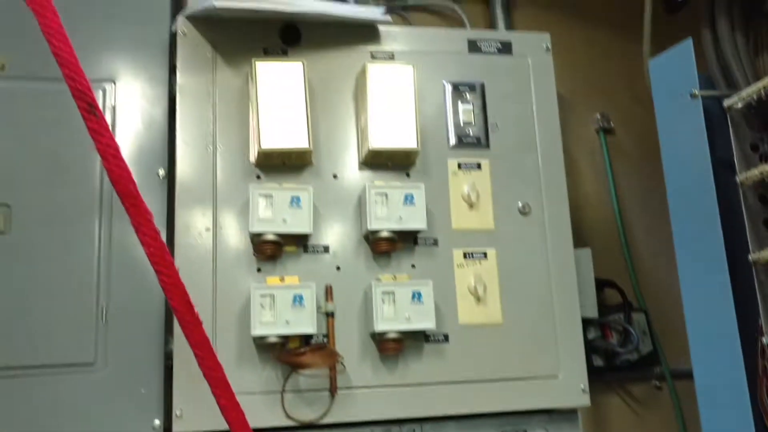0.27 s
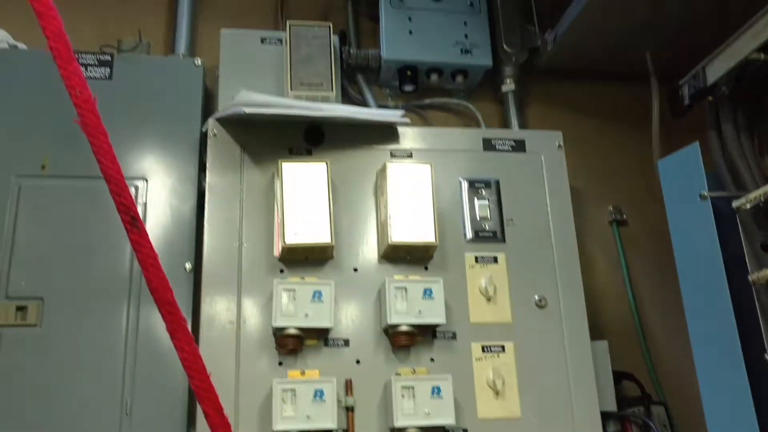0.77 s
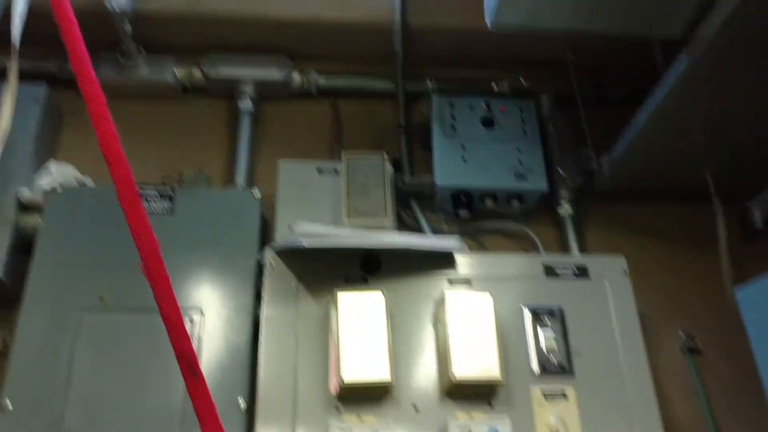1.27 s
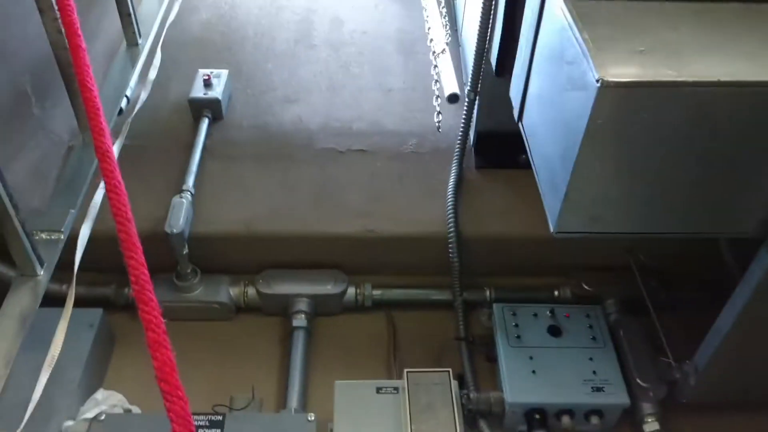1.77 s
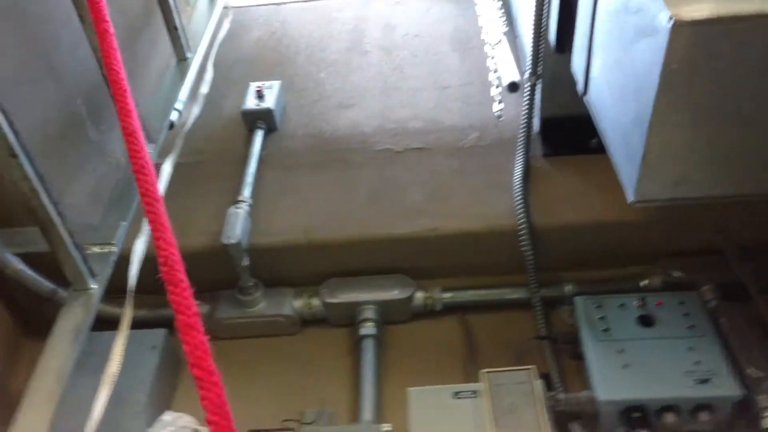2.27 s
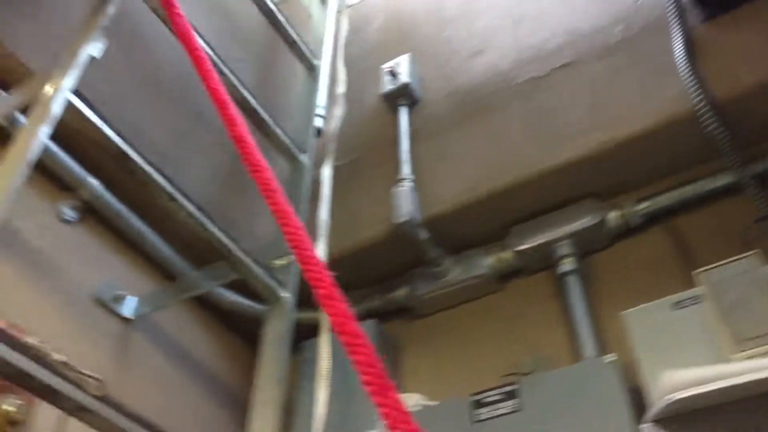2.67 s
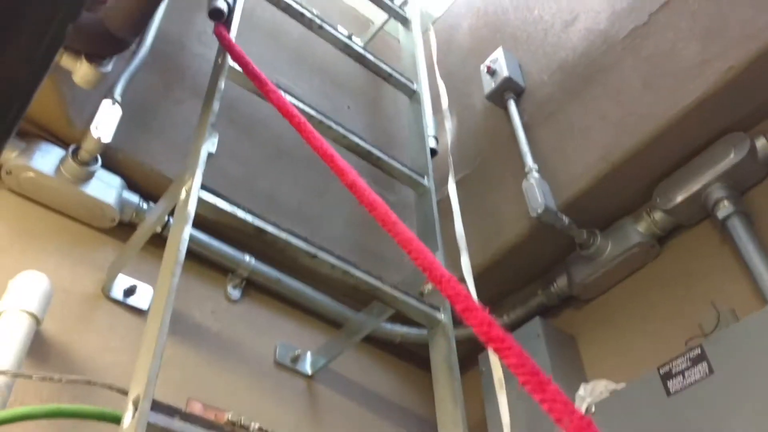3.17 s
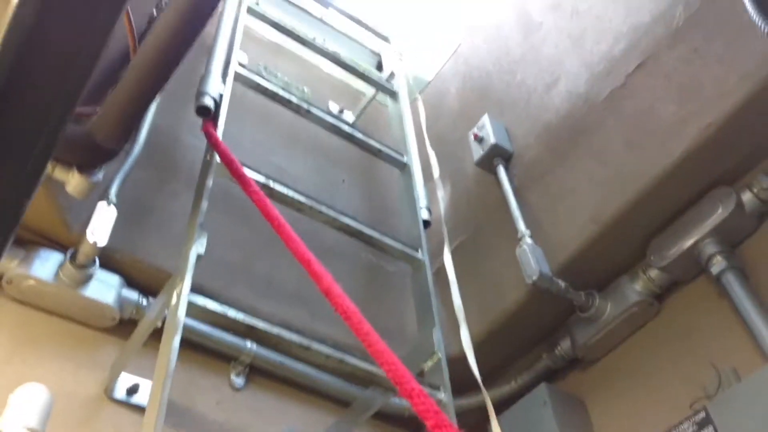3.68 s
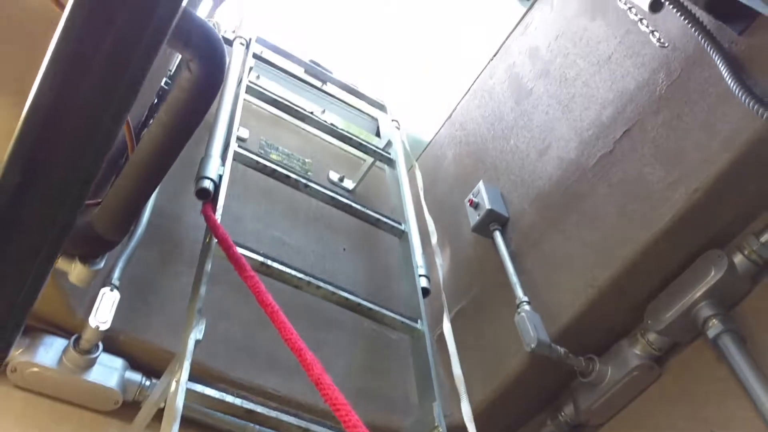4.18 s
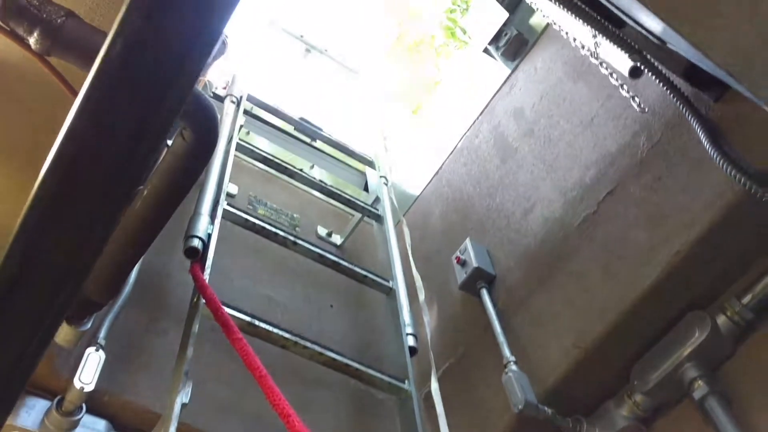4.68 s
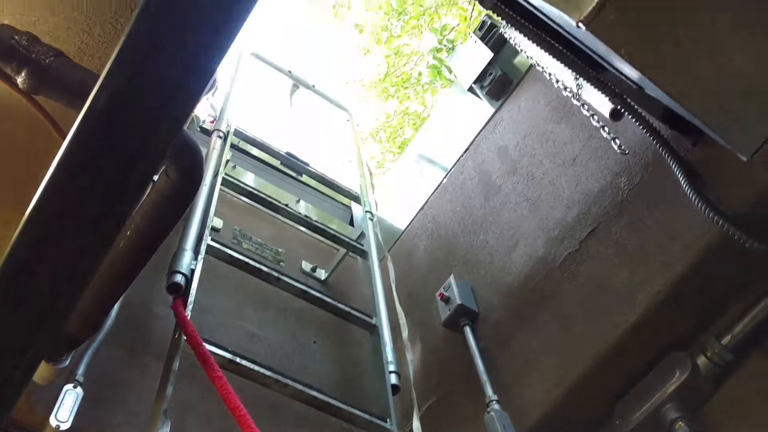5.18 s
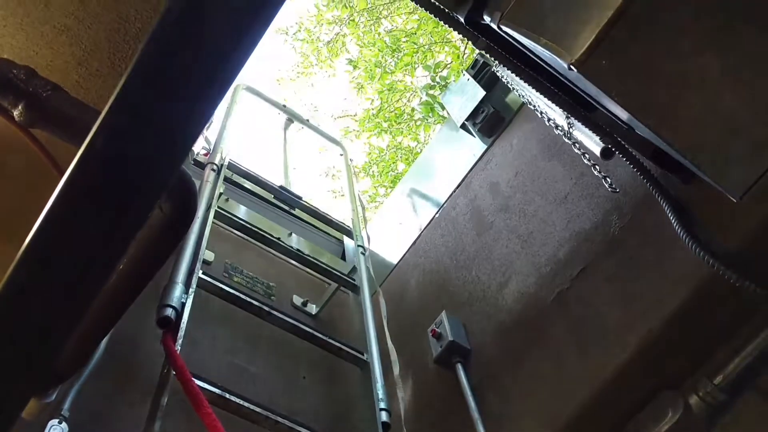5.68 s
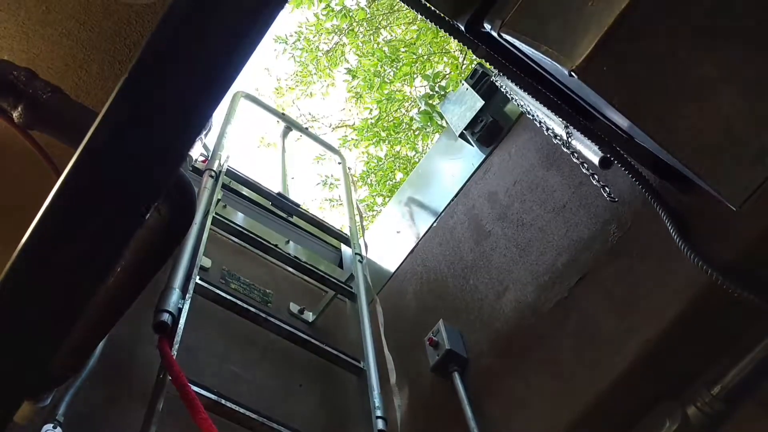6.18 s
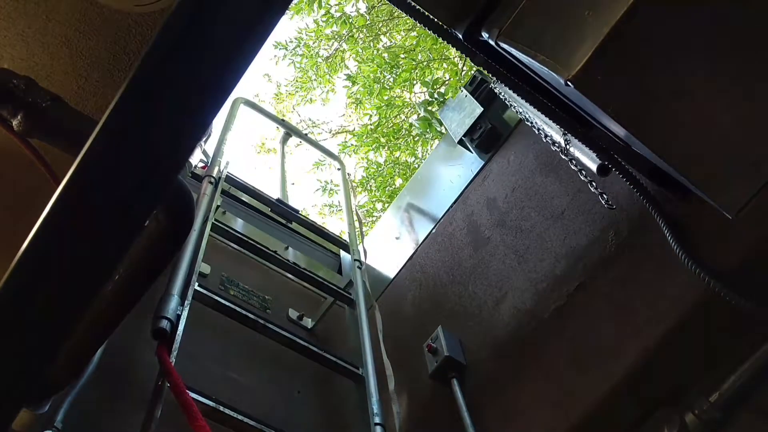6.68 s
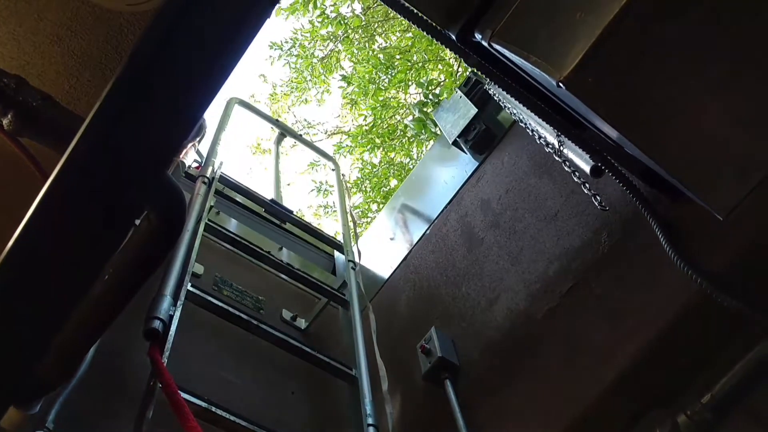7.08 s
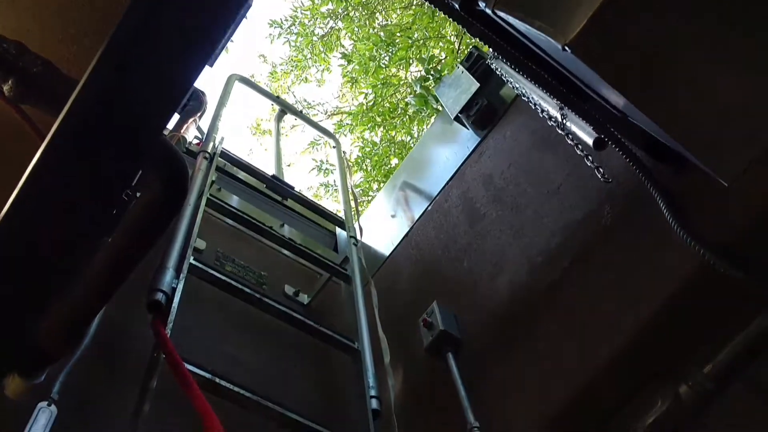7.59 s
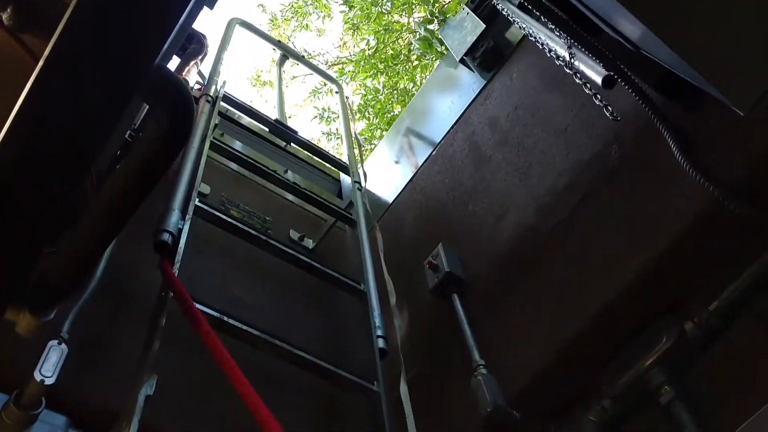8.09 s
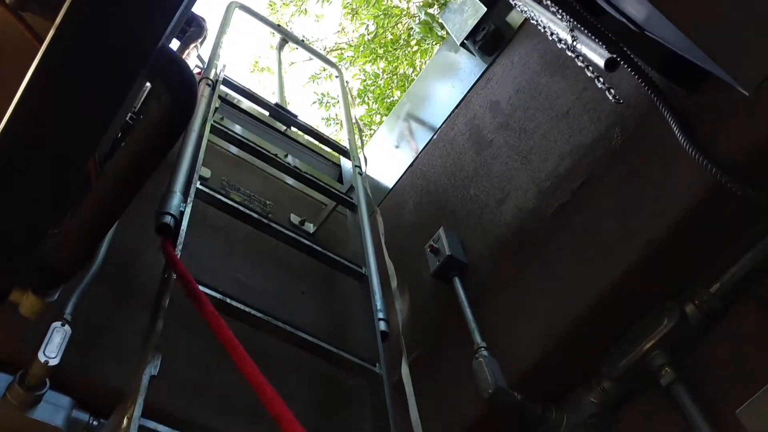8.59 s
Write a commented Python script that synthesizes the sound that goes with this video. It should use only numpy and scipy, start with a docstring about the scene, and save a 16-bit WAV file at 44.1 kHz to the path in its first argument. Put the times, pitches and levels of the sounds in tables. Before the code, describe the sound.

Inside a small concrete vault, ventilation rushes continuously with a mid-low fan hum that beats quickly and unevenly. A breathy hiss opens, then a loud tiny click. A dull double-tap footstep, clothing rustle and faint scrape lead into a hollow knock with rattle and short reverberation. Another sharp click follows later. A very thin, high insect buzz persists faintly. Handheld stereo microphones, close to the clicks, otherwise surrounded by room sound.

```python
"""In a small concrete vault with an open hatch, air-moving equipment runs around a hand-held camera that
turns from a control panel up to the hatch. Filtered noise makes the rush of air, and the blade tones of
three fans of nearly equal speed beat over it; pulsed noise is an insect buzzing outside, a sine a low drone.
Hiss, scuffs, a scrape and rustling clothes are swells of noise; a step and a knock ring damped modes.
Two clicks, bursts of short modes on the camera body, make its limiter duck."""
import sys
import numpy as np
from scipy import signal
from scipy.fft import rfft, irfft, next_fast_len
from scipy.io import wavfile
from scipy.ndimage import uniform_filter1d, minimum_filter1d

SR = 44100
rng = np.random.default_rng(int(sys.argv[2]) if len(sys.argv) > 2 else 0)


def int16_out(signal):
    """Quantize to a 16-bit WAV file."""
    q = np.round(np.clip(np.atleast_2d(signal).T, -1, 1) * 32767)
    wavfile.write(sys.argv[1], SR, q.astype(np.int16))


N = 390285
TIME, FREQ = np.arange(N) / SR, np.fft.rfftfreq(N, 1 / SR)
# the camera swings quickly at first, then settles with this time constant
TURN_START_S, TURN_SETTLE_S = 2.24, 0.68


def amp(db):
    """Decibels to amplitude."""
    return 10 ** (np.asarray(db) / 20)


def unit(x):
    """Scales to rms 1."""
    return x / np.sqrt(np.mean(x ** 2) + 1e-20)


def read(points):
    """Reads a table over log frequency at every bin."""
    hz, value = np.transpose(points)
    return np.interp(np.log(FREQ + 1), np.log(hz + 1), value)


def bell(x, centre, width):
    """A bump of height 1 with the given full width at half height."""
    return 2 ** -np.minimum((2 * (x - centre) / width) ** 2, 100)


def noise(gain):
    """Two unrelated noises, together of rms 1, with the given spectrum."""
    size = next_fast_len(N)
    shape = np.interp(np.fft.rfftfreq(size, 1 / SR), FREQ, gain)
    spectrum = rfft(rng.standard_normal((2, size))) * shape
    return unit(irfft(spectrum, size)[:, :N])


def drift(rate_hz):
    """Random wander of rms 1: twenty sines up to the given rate, the slow ones strongest."""
    hz, t = np.geomspace(rate_hz / 10, rate_hz, 20)[:, None], TIME[::256]
    sines = np.sin(2 * np.pi * (hz * t + rng.random(hz.shape)))
    return np.interp(TIME, t, unit((sines / np.sqrt(hz)).sum(0)))


def ringing(s, hz, t60):
    """A mode struck at time s that decays by 60 dB in t60 seconds."""
    age = np.maximum(TIME - s, 0)
    return np.sin(2 * np.pi * hz * age) * np.exp(-np.minimum(np.log(1000) * age / t60, 40))


def band(x, lo_hz, hi_hz):
    """A causal band-pass."""
    sos = signal.butter(3, [lo_hz, min(hi_hz, .45 * SR)], "bandpass", fs=SR, output="sos")
    return signal.sosfilt(sos, x)


def turned(at_panel, at_hatch):
    """A quantity that glides from one value to the other as the camera turns."""
    left_to_turn = np.exp(-np.maximum(TIME - TURN_START_S, 0) / TURN_SETTLE_S)
    return at_hatch + (at_panel - at_hatch) * left_to_turn


def standing_waves(depth_db, spacing_hz):
    """The fine random ripple, in dB, that a hard small room lays over a spectrum."""
    knots = np.arange(0, SR / 2, max(spacing_hz, 2))
    return depth_db * np.interp(FREQ, knots, rng.standard_normal(SR // 2)[:len(knots)])


def microphones(field, comb_hz=2590):
    """The stereo pair turns diffuse sound alternately into mid and side as frequency rises."""
    # stereo width of the bass: (frequency [Hz], angle [rad], 0 = nearly mono)
    bass_width = [(40, 0.97), (130, 0.91), (225, 0.69), (380, 0.59), (550, 0.42), (800, 0.38), (1300, 0.08)]
    angle = read(bass_width) + np.pi * np.maximum(FREQ / comb_hz - .5, 0)
    leak = .06  # neither mid nor side ever vanishes
    share = np.sqrt((np.array([np.cos(angle), np.sin(angle)]) ** 2 + leak ** 2) / (1 + 2 * leak ** 2))
    mid, side = irfft(rfft(field) * share, N)
    return np.array([mid + side, mid - side])


def air(rush_db=-34.0, surge_db=0.45, boom_edge_hz=300, sway_rad=0.88):
    """Turbulent air coloured by the vault; sway drifts between standing waves, the turn widens the boom."""
    # rush of air in the ducts: (frequency [Hz], relative spectrum level [dB])
    duct_rush = [(30, -37), (65, -26.5), (140, -13.5), (200, -6), (280, -5.5), (420, -3), (540, -3.5),
                 (700, -1), (950, -3.5), (1350, -7), (2200, -13.5), (4200, -23), (7500, -30), (10000, -32),
                 (13500, -30.5), (15200, -58)]
    # resonances and nulls of vault and ducts: (frequency [Hz], width [Hz], lift [dB])
    vault = [(112, 10, 2.5), (136.2, 8.3, 6.5), (154, 14, -2), (185, 10, 8.5), (224, 35, 6), (340.5, 20, 5),
             (393, 14, 3), (426, 21, -4), (471.5, 38, 4), (480, 20, -5), (583, 28, 3), (619, 18, 3),
             (647, 9.3, 3.5), (679, 17, 5), (730, 53, 3.5), (757, 10, -2.5), (837, 20, 0.5), (977, 15, 4.5),
             (1013, 6.8, 3.5), (1185, 27, 2.5), (1730, 16, -2.5), (1933, 34, 2.5), (3320, 580, 1.5)]
    vault_db = read(duct_rush) + sum(db * bell(FREQ, hz, width) for hz, width, db in vault)
    here, there = (amp(vault_db + standing_waves(depth_db=2.2, spacing_hz=10)) for _ in range(2))
    low = 1 / (1 + (FREQ / boom_edge_hz) ** 8)
    above_boom = np.sqrt(1 - low)
    place = np.pi / 4 + sway_rad * drift(0.7014)
    rush = np.cos(place) * noise(here * above_boom) + np.sin(place) * noise(there * above_boom)
    boom = noise(amp(vault_db) * np.sqrt(low))
    boom_db = np.array([turned(-39.5, -39.0), turned(-45.5, -40.0)])  # fed to mid, to side
    return rush * amp(rush_db + surge_db * drift(5.4)) + boom * amp(boom_db)


def fans(tone_db=1.0, octave_wander_rad=0.83, octave_lag_share=0.51, in_step_s=6.075):
    """Three blade tones beat; in the turn they move from right to slightly left and the left lags more."""
    # wandering blade tones: (time [s], then frequency [Hz] and relative level [dB] of each of three fans)
    blade_tones = [(0, 304.70, -43.8, 308.62, -41.6, 309.56, -37.3),
                   (2, 304.87, -40.9, 308.53, -38.5, 309.30, -35.6),
                   (3.5, 304.81, -40.2, 308.72, -42.2, 309.70, -36.0),
                   (5, 304.82, -39.5, 308.68, -40.6, 309.57, -36.5),
                   (7, 304.80, -39.6, 308.58, -41.1, 309.39, -36.3),
                   (8.85, 304.86, -40.1, 308.55, -38.4, 309.55, -35.1)]
    # octave as the camera moves through its standing waves: (time [s], level [dB] relative to the table above)
    octave_path = [(0, -21), (1.5, -17), (2.3, -9), (3.0, -14.5), (3.7, -20), (8.85, -17)]
    sides = np.array([[1], [-1]])  # left, right
    lag_rad, pan_db = turned(0.36, 1.42), turned(-3.5, 1.5)
    times, *columns = np.transpose(blade_tones)
    octave_db = np.interp(TIME, *np.transpose(octave_path))
    level_db = tone_db + sides * pan_db / 2 + .35 * drift(14)
    out = np.zeros((2, N))
    for speeds, levels in zip(columns[::2], columns[1::2]):
        phase = 2 * np.pi * np.cumsum(np.interp(TIME, times, speeds)) / SR
        db = np.interp(TIME, times, levels)
        # apart from a slight wander, all three are in step at in_step_s
        phase = phase - phase[round(in_step_s * SR)] + .07 * drift(3)
        out += amp(db + level_db) * np.cos(phase - sides * lag_rad / 2)
        octave_phase = 2 * phase - sides * octave_lag_share * lag_rad / 2 + octave_wander_rad * drift(8)
        out += amp(db + octave_db) * np.cos(octave_phase)
    return np.sqrt(2) * out


def clicks():
    """Millisecond snaps ring the camera body, each nearer to one microphone."""
    # snaps, a few to each click: (time [s], level of the louder side [dB], left over right [dB], top [Hz])
    snaps = [(1.7857, 0.5, -28, 16000), (1.7861, -10, 18, 16000), (1.7877, -20, -5, 16000),
             (5.24085, -4, 6, 10900), (5.24116, -2.5, -26, 11100), (5.24147, -26, 16, 11000)]
    # modes of the camera body: (frequency [Hz], relative level [dB], t60 [s])
    body = [(3880, -5, 0.0022), (6400, 0, 0.0025), (8770, -7, 0.0038), (12000, 1, 0.0012)]
    snap = sum(amp(db) * ringing(0, hz, t60)[:256] for hz, db, t60 in body)
    blows = np.zeros((2, N))
    for s, db, pan_db, top_hz in snaps:
        tick, at = band(snap, lo_hz=3650, hi_hz=top_hz), round(s * SR)
        side_db = [[db + min(pan_db, 0)], [db - max(pan_db, 0)]]
        blows[:, at:at + len(tick)] += amp(side_db) * tick / abs(tick).max()
    return blows


def knock(knock_s=3.408, tail_db=-27.5, thump_db=-12, thump_rise_s=0.0035, crack_db=-18, crack_t60=0.0029):
    """One blow: a hollow thump, sharp cracks as the thing rattles, and broad bands ringing in the vault."""
    # modes of the knocked thing: (frequency [Hz], relative level [dB], t60 [s])
    thump_modes = [(258, -10, 0.08), (435, 1.5, 0.038), (533, -3, 0.035), (1980, -17, 0.061)]
    # rattle as it settles: (time [s], relative level [dB], pitch [Hz])
    rattle = [(3.4105, -10, 6500), (3.414, -8, 4000), (3.416, -2, 1300), (3.418, -4, 3900),
              (3.426, -11, 1700), (3.4355, -2, 1900)]
    # ring in the vault: (frequency [Hz], half width [Hz], relative level [dB], t60 [s])
    vault_ring = [(232, 150, 0.5, 0.16), (494, 89, -0.5, 0.3), (1350, 300, -5.5, 0.45), (2180, 570, 1, 0.3),
                  (3880, 1050, -3.5, 0.3), (6500, 1400, -11, 0.26)]
    age = np.maximum(TIME - knock_s, 0)
    ring = sum(noise(bell(FREQ, hz, 2 * width)) * amp(db) * np.exp(-np.log(1000) * age / t60)
               for hz, width, db, t60 in vault_ring)
    rough = unit(amp(1.2 * unit(uniform_filter1d(rng.standard_normal(N), size=70))))
    cracks = sum(amp(db) * ringing(s, hz, crack_t60) for s, db, hz in rattle)
    modes = sum(amp(db) * ringing(knock_s, hz, t60) for hz, db, t60 in thump_modes)
    thump = (1 - np.exp(-age / thump_rise_s)) * modes
    rise = 1 - np.exp(-age / .0007)
    tail = microphones(band(amp(tail_db) * rise * rough * ring, lo_hz=120, hi_hz=11000))
    return tail + amp(thump_db) * thump + amp(crack_db) * cracks


def footfalls(rise_s=0.0045):
    """Heel and sole come down with two dull, quickly damped taps."""
    # heel and sole of one step: (time [s], level [dB])
    taps = [(2.954, -23), (2.990, -22.5)]
    # modes of the shoe on the floor: (frequency [Hz], relative level [dB], t60 [s])
    sole = [(470, -4, 0.065), (603, 2.5, 0.07), (930, -7, 0.05), (1400, -7, 0.04)]
    return sum(amp(step_db + db) * (1 - np.exp(-np.maximum(TIME - s, 0) / rise_s)) * ringing(s, hz, t60)
               for s, step_db in taps for hz, db, t60 in sole)


def grainy_bands(events, half_width_octaves, grain_db=2.0):
    """Each event is one grainy band of noise that rises and falls."""
    grain = unit(amp(grain_db * unit(uniform_filter1d(rng.standard_normal(N), size=200))))
    swells = 0
    for s, length, db, hz in events:
        colour = bell(np.log2(FREQ + 1), np.log2(hz), 2 * half_width_octaves)
        swells = swells + amp(db) * bell(TIME, s, length / 2) * noise(colour)
    return grain * swells


def soft_swells():
    """Soft grainy swells of noise: hiss near the panel, scuffs, a scrape before the knock, a faint tick."""
    # swells: (crest time [s], length, twice that at half height [s], crest level [dB], centre [Hz])
    noise_swells = [(0.2, 0.75, -48.5, 3400), (0.22, 0.94, -40.5, 1450), (0.31, 0.16, -50, 6650),
                    (2.927, 0.27, -54, 4970), (2.943, 0.042, -37, 1450), (2.975, 0.12, -34, 805),
                    (3.24, 0.16, -39.5, 1190), (3.397, 0.028, -39, 5000), (8.06, .09, -52.5, 6500)]
    return grainy_bands(noise_swells, half_width_octaves=0.4)


def rustle(crest_s=3.31, length_s=0.71, level_db=-41, flutter_db=3.2):
    """Clothes rustle, a fluttering swell of noise, while the camera is swung round."""
    # colour of the cloth: (frequency [Hz], relative spectrum level [dB])
    cloth = [(30, -16), (130, 3), (500, 7.5), (1100, 5), (2000, -7), (4000, -15), (7000, -23), (12000, -38)]
    flutter = amp(level_db + flutter_db * drift(25))
    return flutter * bell(TIME, crest_s, length_s) * noise(amp(read(cloth)))


def bumps():
    """The hand bumps the camera softly, a short burst of low noise."""
    # bumps: (crest time [s], length, twice that at half height [s], crest level [dB], centre [Hz])
    hand_bumps = [(4.018, 0.05, -53, 60)]
    return grainy_bands(hand_bumps, half_width_octaves=0.76)


def insect(level_db=-51, waver_db=0.5):
    """Wing cycles, about twenty a second, swell a rasp of noise in one broad band and narrow lines."""
    # swells of the rasp in one wing cycle: (place [share of cycle], length [share of cycle], strength [1])
    strokes = [(.24, .2, .6), (.47, .65, .65), (.6, .16, .45)]
    # bands of the rasp, one broad, and narrow lines from the room: (frequency [Hz], width [Hz], relative level [dB])
    rasp_bands = [(10630, 70, 5), (10760, 1560, 2), (11560, 90, -6), (11780, 140, -6)]
    cycle = (19.75 * TIME + .06 * drift(2)) % 1
    stroke = .65 + sum(strength * bell(cycle, place, length) for place, length, strength in strokes)
    colour = sum(amp(db) * bell(FREQ, hz, width) for hz, width, db in rasp_bands)
    rasp = noise(colour * amp(standing_waves(depth_db=3.0, spacing_hz=35.1)))
    return amp(level_db + waver_db * drift(1.92)) * unit(stroke) * rasp


def panel(level_db=-38):
    """Air rings in the corner by the panel and fades as the camera turns away."""
    # resonances heard only in front of the panel: (frequency [Hz], width [Hz], relative level [dB])
    corner = [(207.6, 7.9, 1), (223, 9, 6.5), (243, 11.6, 3.5), (382.7, 12, -1.5), (589.5, 22, -3),
              (1390, 300, -11.5), (3410, 170, -38)]
    colour = sum(amp(db) * bell(FREQ, hz, width) for hz, width, db in corner)
    return amp(level_db) * turned(0.98, 0) * noise(colour)


def drone(rest_db=-65.5, hz=95.2, wander_rad=0.06):
    """A faint low sine, alike in both channels, that swells and fades twice."""
    # swells: (full from [s], full until [s], rms level [dB], rise time constant [s], fall time constant [s])
    drone_swells = [(2.7, 3.3, -55, 0.74, 0.28), (4.88, 5.25, -55.5, 0.1, 0.43)]
    swells = sum(amp(db) * np.exp(-np.maximum((s - TIME) / rise, (TIME - end) / fall).clip(0))
                 for s, end, db, rise, fall in drone_swells)
    tone = np.sin(2 * np.pi * hz * TIME + wander_rad * drift(2.0))
    return np.sqrt(2) * np.maximum(amp(rest_db), swells) * tone


def scene():
    """Diffuse sound of the vault, the steady tones, the blows and the clicks."""
    diffuse = air() + soft_swells() + rustle() + bumps() + insect() + panel()
    return microphones(diffuse) + fans() + clicks() + knock() + footfalls() + drone()


def record(dry, ceiling_db=-9.5, recover_db_per_s=10.5, edge_hz=16000):
    """A peak limiter on both channels drops within two milliseconds, recovers slowly; then a low-pass."""
    peak_db = 20 * np.log10(abs(dry).max(0) + 1e-9)
    recovery = TIME * recover_db_per_s
    held_db = np.maximum.accumulate(peak_db + recovery) - recovery
    over_db = np.maximum(held_db - ceiling_db, 0)
    # it looks ahead, so the gain is down when the peak arrives
    gain_db = uniform_filter1d(minimum_filter1d(-over_db, size=89), size=89)
    low_pass = signal.firwin(511, edge_hz, window=("kaiser", 9), fs=SR)
    return signal.oaconvolve(dry * amp(gain_db), low_pass[None], "same")


dry = scene()
out = record(dry)
int16_out(out)
```